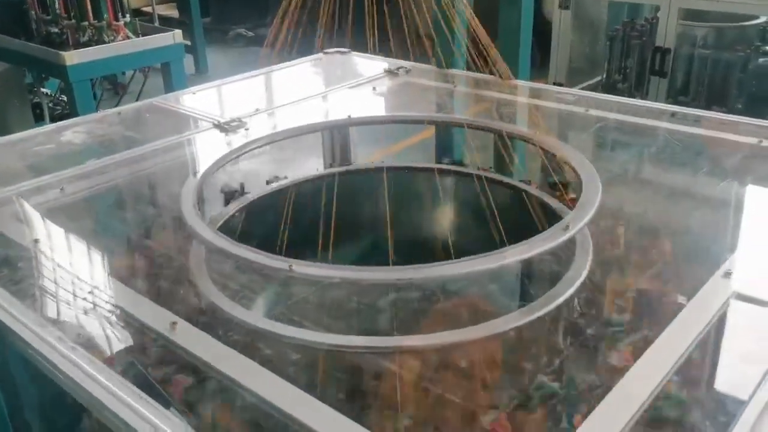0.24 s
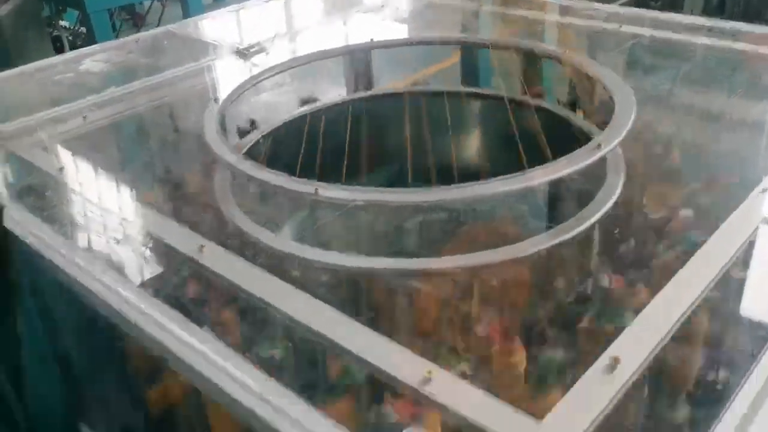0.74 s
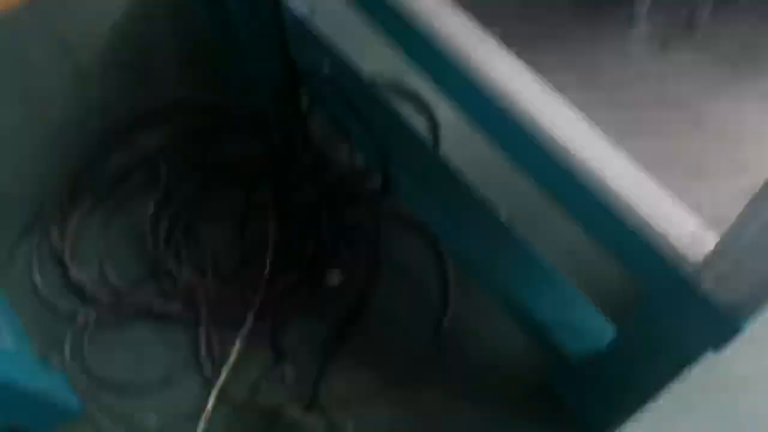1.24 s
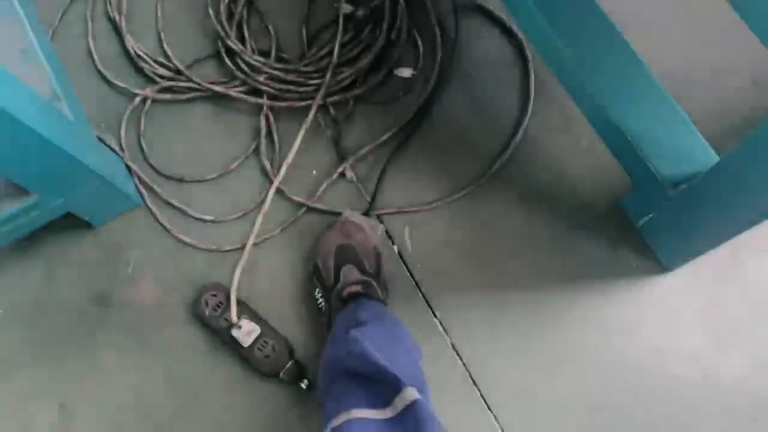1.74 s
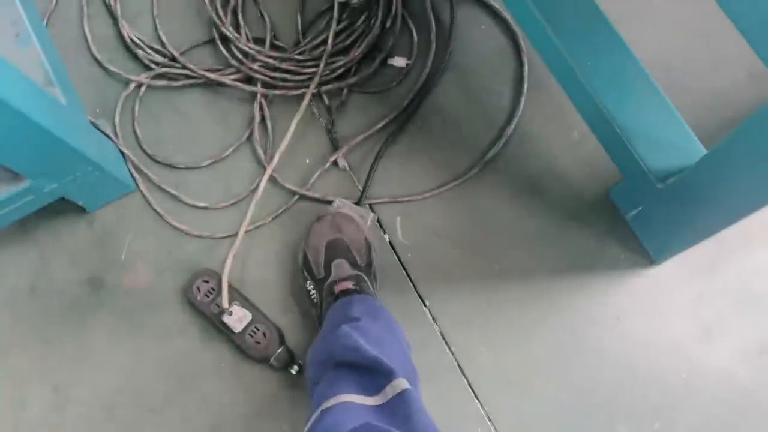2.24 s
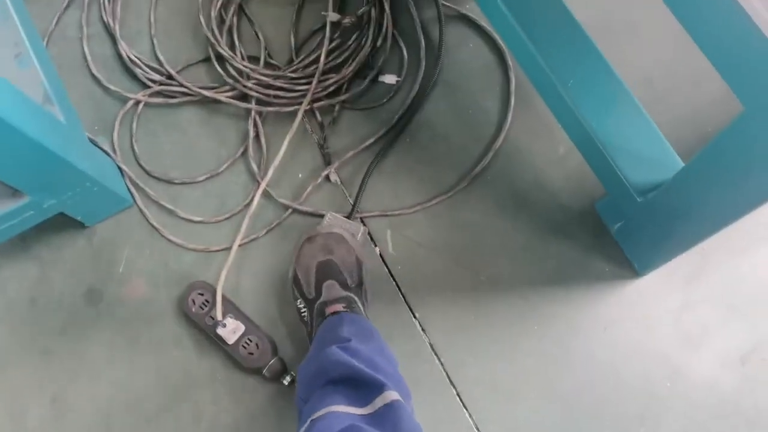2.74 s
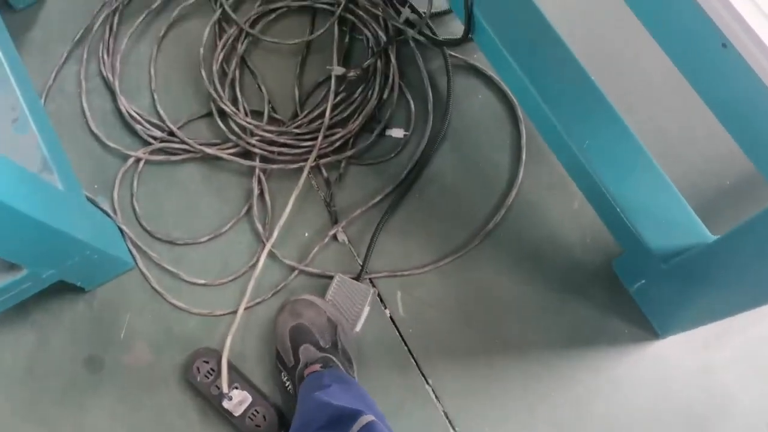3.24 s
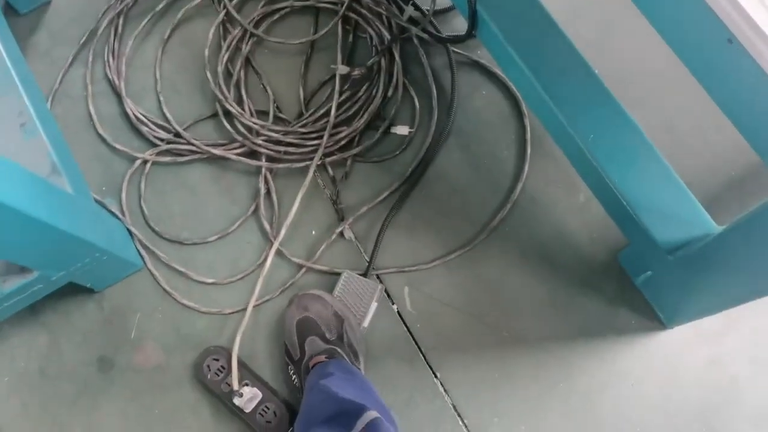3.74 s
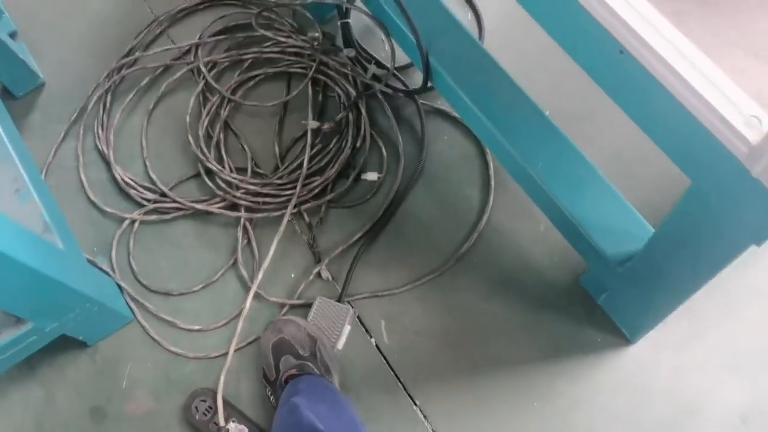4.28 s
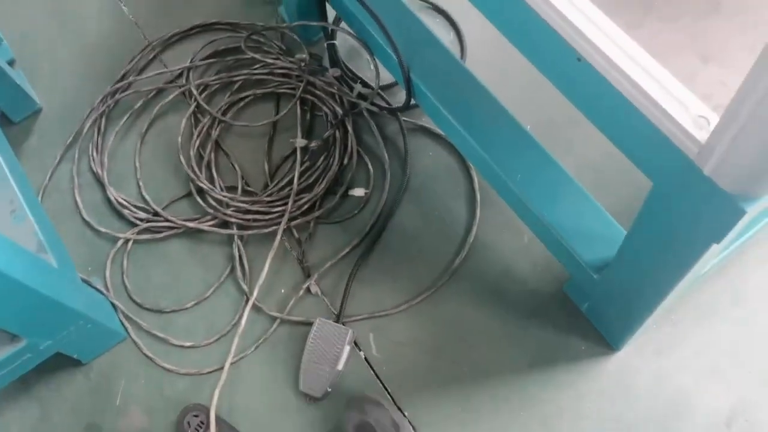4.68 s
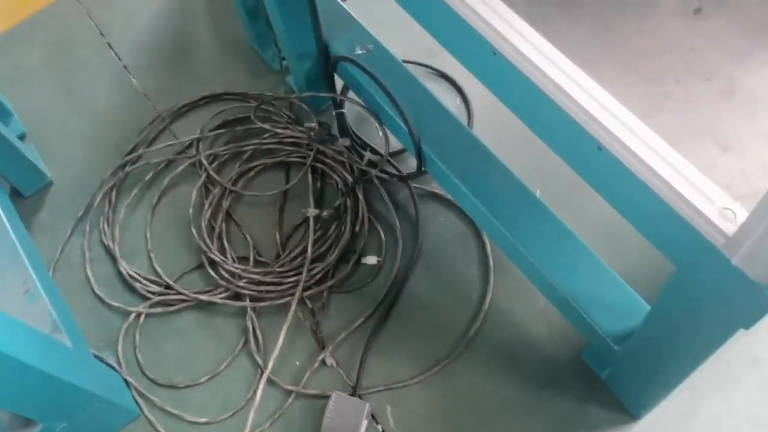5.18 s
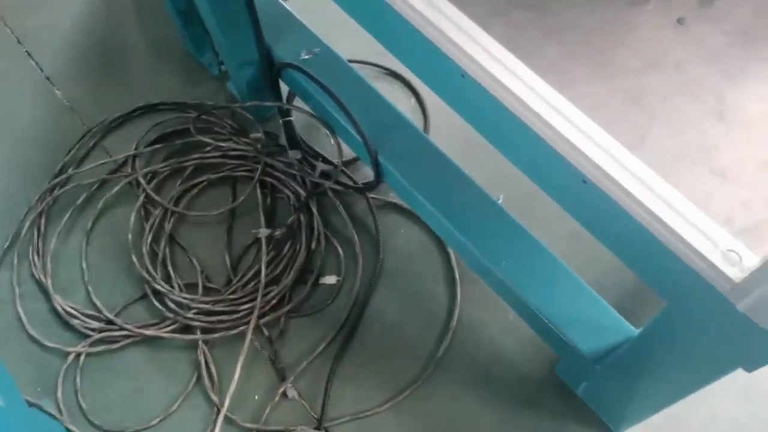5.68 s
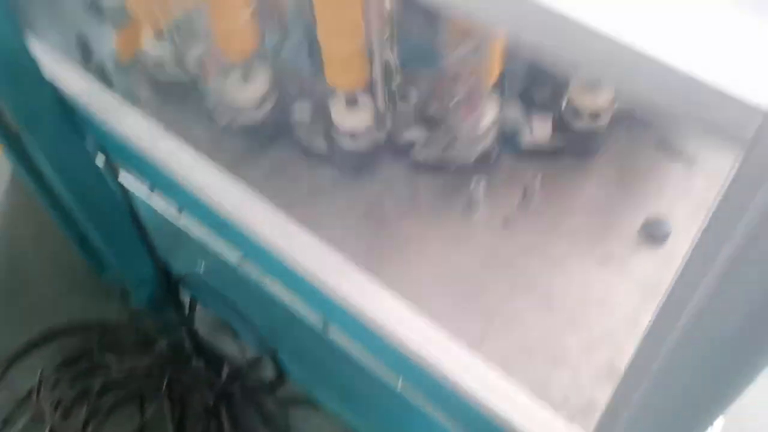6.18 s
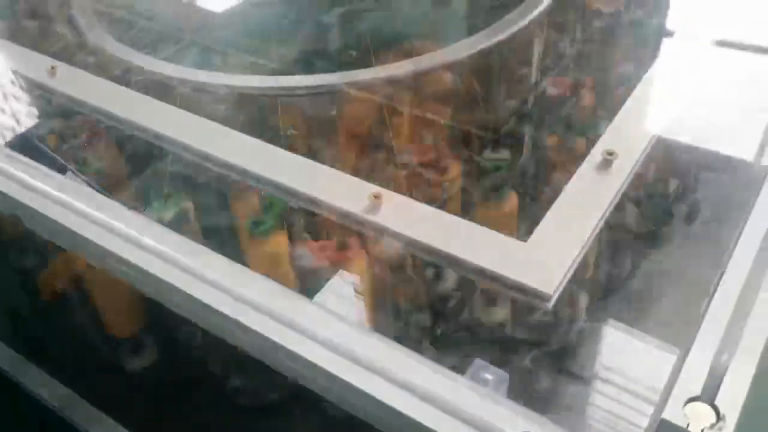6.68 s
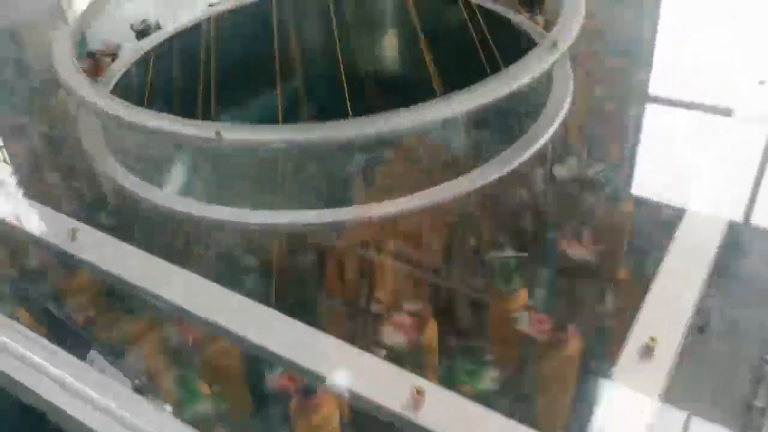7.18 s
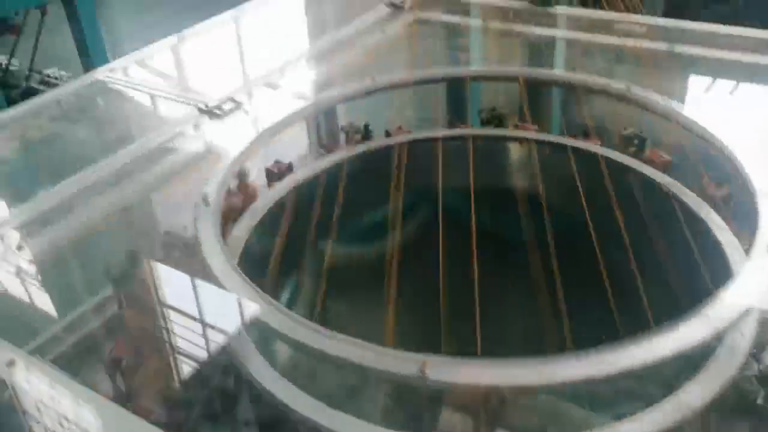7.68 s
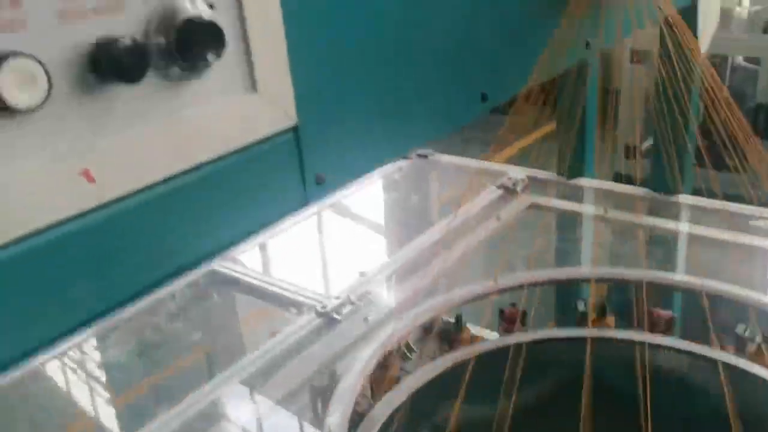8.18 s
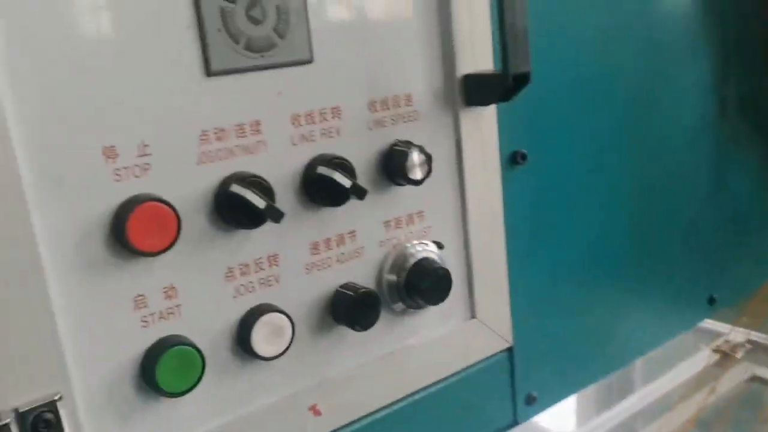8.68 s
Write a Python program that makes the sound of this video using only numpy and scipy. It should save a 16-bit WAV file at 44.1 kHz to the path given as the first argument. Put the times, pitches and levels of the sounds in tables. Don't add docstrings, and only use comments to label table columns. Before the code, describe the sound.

Many metal carriers clack together about nine times a second, ringing the machine frame. The clatter dies within a fraction of a second, leaving distant hums and hiss. A bright switch click, then a short lurching run of under a second; another stop, soft shoe scuffs, a heavier clack of the switch, and a long full-speed run to the end. Handheld microphone in a reverberant factory hall, moving slightly nearer the open top.

```python
import sys
import numpy as np
from scipy import signal
from scipy.io import wavfile
from scipy.ndimage import uniform_filter1d

SR = 44100
rng = np.random.default_rng(int(sys.argv[2]) if len(sys.argv) > 2 else 0)


def transcribe(signal):
    frames = np.atleast_2d(signal).T
    limited = np.clip(frames, -1, 1)
    pcm = np.round(limited * 32767).astype(np.int16)
    wavfile.write(sys.argv[1], SR, pcm)


def elevation(decibels):
    levels = np.asarray(decibels, float)
    return 10 ** (levels / 20)


N = 393372


def evened(x):
    return x / np.sqrt(np.mean(x ** 2) + 1e-20)


def read(points, hz):
    f, value = np.transpose(points)
    return np.interp(np.log(hz + 1), np.log(f + 1), value)


def curve(rows):
    s, *columns = np.transpose(rows)
    return [np.interp(np.arange(N) / SR, s, c) for c in columns]


def add(mix, s, sound):
    part = mix[round(s * SR):][:len(sound)]
    part += sound[:len(part)]


def colour(x, points):
    hz = np.abs(np.fft.fftfreq(8192, 1 / SR))
    (low_hz, low_db), (high_hz, high_db) = points[0], points[-1]
    closed = [(low_hz * .8, low_db - 40)] + list(points) + [(high_hz * 1.15, high_db - 40)]
    log_gain = np.log(elevation(read(closed, hz)))
    taps = np.fft.ifft(np.exp(np.conj(signal.hilbert(log_gain)))).real[:4096]
    return evened(signal.oaconvolve(x, taps)[:len(x)])


def resonate(x, hz, width):
    return signal.lfilter(*signal.iirpeak(hz, hz / width, SR), x)


def resonate_twice(x, hz, width):
    return resonate(resonate(x, hz, width), hz, width)


def bandpass(x, order, low_hz, high_hz):
    return signal.sosfilt(signal.butter(order, [low_hz, high_hz], "bandpass", fs=SR, output="sos"), x)


def wander(per_s):
    steps = rng.standard_normal(round(N / SR * 40) + 2)
    return np.interp(np.arange(N) / SR * per_s, np.arange(len(steps)), steps)


def knocks(per_s, spread_db):
    draw = rng.random(N) * SR / per_s
    size = rng.exponential(1, N)
    return np.where(draw < 1, np.sign(draw - .5) * elevation(spread_db * np.minimum(size, 5)), 0)


# f/Hz, t60/s
ECHO_T60 = [(100, 0.74), (1000, 0.75), (4000, 0.62), (12000, 0.65)]


def room(x):
    out = np.zeros(N)
    slots = np.arange(400, SR - 20, 20)
    for k in range(3):
        taps = np.zeros(SR)
        taps[slots + rng.integers(0, 20, len(slots))] = rng.choice([-1., 1.], len(slots))
        hz, t, z = signal.stft(taps, SR, nperseg=256)
        dying = elevation(-60 * t / read(ECHO_T60, hz)[:, None])
        tail = signal.istft(z * dying, SR, nperseg=256)[1]
        tail = tail[:SR * 2 // 3] / np.linalg.norm(tail)
        turn = np.sqrt(2 / 3) * np.cos(2 * np.pi * (.6 * np.arange(N) / SR + k / 3))
        out += signal.oaconvolve(x * turn, tail)[:N]
    return out


# f/Hz, level/dB
HALL_SPECTRUM = [(25, -14), (45, -10.5), (80, -17.5), (105, -11), (140, -15.5), (190, -8.5), (400, -6.5),
                 (680, -6), (800, -9), (1560, -13), (3000, -20.5), (4600, -32), (6500, -33), (7900, -34.5),
                 (9000, -50), (13000, -50)]
# t/s, level/dB
HALL_DRIFT = [(0, 2), (2.6, .5), (3.4, 0), (4.8, 1), (5.3, -1), (5.45, -2.5), (5.6, .5), (9, 1)]
# f/Hz, width/Hz, level/dB
HUMS = [(186.7, 11, -75), (445, 24, -61), (513, 14, -67), (676.3, 90, -57.5), (930, 10, -73),
        (1170, 55, -63.5), (5510, 260, -62.5)]


def hall():
    frames = N // 256 + 5
    a, b, patches = rng.standard_normal((frames, 513, 3)).T
    patches = evened(uniform_filter1d(uniform_filter1d(patches, 8, 0), 12, 1))
    spectrum_db = read(HALL_SPECTRUM, np.fft.rfftfreq(1024, 1 / SR))[:, None]
    z = (a + 1j * b) * elevation(spectrum_db + 1.4 * patches)
    wash = elevation(-46) * evened(signal.istft(z, nperseg=1024, noverlap=768)[1][:N])
    noise = rng.standard_normal(N)
    hums = sum(elevation(db + 2.6 * wander(7)) * evened(resonate_twice(noise, hz, width))
               for hz, width, db in HUMS)
    return elevation(curve(HALL_DRIFT)[0] + 0.33 * wander(16)) * wash + hums


# t/s, level/dB, brightness/0-1, rattle/ms, spring pitch/share
SWITCH_CLICKS = [(3.114, -51, 1, 3, 1), (3.131, -43, 0.6, 2, 1), (3.141, -49, 1, 3, 1),
                 (3.2335, -38, 1, 2, .8), (3.2352, -28, 0.97, 1.7, 1), (3.2405, -41, 1, 2, .8),
                 (5.352, -22.5, 0.2, 1.3, .85), (5.355, -29.5, 0.05, 5, 1), (5.364, -38, .2, 3, 1),
                 (5.368, -27, 0.5, 2, .87), (5.374, -43, .1, 5, 1), (5.3868, -25, 0.65, 3, 1.05),
                 (5.39, -27, 0.75, 3, .97)]
# f/Hz, width/Hz, level/dB
PLATE = [(780, 200, 5), (1000, 250, 12), (1070, 70, 5), (2560, 300, 7), (2940, 620, 8), (3070, 160, 5),
         (3900, 300, -8), (5600, 600, -5), (6870, 200, -10)]
# f/Hz, width/Hz, level/dB
SPRING = [(2980, 300, -14), (5600, 830, -9), (6120, 360, -5), (7050, 450, 1.5), (7570, 200, -11),
          (9100, 250, -6), (10330, 300, -8), (11500, 450, -8), (12300, 500, -12), (13400, 600, -16)]
# t/s, length/s, level/dB, low edge f/Hz,
# high edge f/Hz
SCUFFS = [(3.04, .2, -51, 600, 740), (3.102, 0.078, -62, 6000, 13000), (3.23, .02, -50, 4300, 5100),
          (3.238, .04, -57, 5000, 13000), (3.238, .045, -56, 6950, 7250), (4.48, .4, -47, 30, 150),
          (4.45, .25, -46, 790, 860), (4.745, 0.08, -55, 6000, 13000), (4.778, 0.14, -54, 2800, 3720),
          (5.319, 0.027, -51, 4500, 13000), (5.333, .05, -44, 600, 3200), (5.366, .026, -49, 2400, 3500),
          (5.385, 0.05, -52, 2000, 12000), (5.483, 0.03, -45, 700, 4200), (5.49, 0.1, -54, 1200, 4000),
          (5.44, .24, -66, 9000, 9600), (5.5, .05, -47, 160, 260), (5.64, .04, -47, 160, 260),
          (5.7, .12, -36, 280, 480)]


def rung(rattle, part, pitch):
    sound = sum(elevation(db) * resonate_twice(rattle, pitch * hz, 1.4 * width) for hz, width, db in part)
    return sound / abs(sound).max()


def foot_switch():
    out = np.zeros(N)
    t = np.arange(1500) / SR
    for s, db, bright, ms, pitch in SWITCH_CLICKS:
        rattle = rng.standard_normal(len(t)) * np.exp(-t * 1000 / ms)
        rattle[0] = 5.6
        bright = np.clip(bright, 0, 1)
        sound = (1 - bright) * rung(rattle, PLATE, 1) + bright * rung(rattle, SPRING, pitch)
        add(out, s, elevation(db + 7) * sound)
    for s, length, db, low_hz, high_hz in SCUFFS:
        hiss = bandpass(rng.standard_normal(SR // 4)[:round(length * SR)], 3, low_hz, high_hz)
        add(out, s, elevation(db) * evened(hiss) * np.hanning(len(hiss)))
    return out + elevation(-22) * room(out)


# starts to turn t/s, spin-up length/s, switched off t/s, frame knocks level/dB
RUNS = [
    (-1, .4, 2.09, -26),
    (3.37, .52, 4.27, -25.5),
    (5.62, .4, 9.5, -25.5),
]
# t/s, whine level/dB
DRIVE = [
    (-1, -55),
    (3.29, -58),
    (5.44, -54),
]
SPIN_UP_BEND = [1.4, 1.3, 1.9]


def motor():
    standing_db, brake_db_per_s, grip_s = -30, 84, .07
    t = np.arange(N) / SR
    run = np.searchsorted([row[0] for row in DRIVE], t, "right") - 1
    on, spin_up, off, full_db = np.array(RUNS)[run].T
    waiting = 1 - (t - on) / spin_up
    rising_db = standing_db * np.clip(waiting, 0, 1) ** np.array(SPIN_UP_BEND)[run]
    rising_db -= 300 * np.maximum(waiting - 1, 0)
    late = np.maximum(t - off, 0)
    braking_db = -brake_db_per_s * (late - grip_s * (1 - np.exp(-late / grip_s)))
    return rising_db, braking_db, full_db, run


def drive_whine():
    t = np.arange(N) / SR
    rising_db, braking_db, _, run = motor()
    on, full_db = np.array(DRIVE)[run].T
    beating_db = 2.5 * np.sin(2 * np.pi * 11 * t) * np.sin(2 * np.pi * 4.3 * t)
    swelling_db = -18 * np.exp(-(t - on) / .12)
    fading_db = 130 * np.maximum(t - np.array(RUNS)[run, 2], 0)
    level_db = full_db + beating_db + swelling_db - fading_db
    smear = np.clip(.12 + elevation(.6 * (rising_db + braking_db)), 0, 1)
    jitter = evened(uniform_filter1d(rng.standard_normal(N), 120))
    hz = 10002 + smear * (-60 + 130 * jitter)
    tone = np.sqrt(2) * np.sin(2 * np.pi * np.cumsum(hz) / SR)
    return elevation(level_db) * np.minimum((t - on) / .02, 1) * tone


CROSSING_S = [1, 4.031, 7.324]


def cycle(lack_db, run):
    crossings_per_s, lag_db = 8.75, 4
    speed = np.minimum(elevation(.5 * (lack_db + lag_db)), 1)
    turns = np.cumsum(speed) * crossings_per_s / SR
    return turns - turns[(np.array(CROSSING_S) * SR).astype(int)][run], speed


# place/share of cycle, level/dB
SWARM = [(0, 2.5), (.25, 4.03), (.42, 0.3), (.55, 2.9), (.8, 0), (.93, 0.5), (1, 2)]


def crossing_swarm(lack_db, run):
    turns, speed = cycle(lack_db, run)
    half_cycle = np.floor(2 * turns).astype(int) + 200
    strength_db = .6 * rng.standard_normal(400)[half_cycle]
    shape_db = .85 * np.interp(turns % 1, *np.transpose(SWARM))
    swarm = elevation(speed * (shape_db + uniform_filter1d(strength_db, 300)))
    speed = np.maximum(speed, .45)
    return swarm / np.sqrt(speed), speed


# f/Hz, t60/s, then level/dB in runs 1, 2, 3
RINGS = [(200.6, 0.12, 0, 2, -4), (399, 0.066, 2.5, -6, -1.5), (428, 0.078, 0.5, 1.5, 0),
         (700, 0.088, -1, 0, 2), (780, 0.054, -1, 1, -2), (860, 0.074, 2.5, -7.5, -6.5),
         (1088, 0.083, -5, -1.5, -3), (1837, .08, -2.5, -4, -4), (1970, 0.088, 0, -11, -4),
         (2198, 0.1, -3, 1, -4)]


def ringing_parts(swarm, speed, run):
    t = np.arange(6000) / SR
    out = np.zeros(N)
    for hz, t60, *db in RINGS:
        blows = swarm * elevation(np.array(db)[run]) * knocks(55 * speed, 2.4)
        ring = elevation(-60 * t / t60) * np.sin(2 * np.pi * hz * t)
        out += signal.oaconvolve(blows, ring)[:N]
    return evened(out)


# t/s, level/dB, f/Hz
STRUCK = [(0.006, -27.6, 775.0), (0.073, -27.7, 452.0), (0.192, -24.6, 409.0), (0.221, -28.0, 872.0),
          (0.337, -28.1, 915.0), (0.424, -28.1, 420.0), (0.491, -27.6, 851.0), (0.537, -27.1, 398.0),
          (0.558, -27.5, 851.0), (0.654, -24.1, 431.0), (0.787, -25.6, 786.0), (0.886, -27.2, 732.0),
          (1.109, -25.8, 743.0), (1.159, -27.7, 205.0), (1.33, -30.6, 2196.0), (1.335, -27, 444),
          (1.469, -23.6, 420.0), (1.687, -25.9, 334.0), (1.788, -27.0, 711.0), (1.82, -24.1, 420.0),
          (2.058, -27.1, 409.0), (2.079, -30.9, 1163.0), (3.652, -30.2, 194.0), (3.777, -29.6, 2196.0),
          (3.797, -26.7, 301.0), (3.811, -26.5, 818.0), (3.913, -27.0, 377.0), (3.916, -33.6, 2885.0),
          (4.044, -26.9, 721.0), (4.139, -25.1, 431.0), (4.221, -25.6, 194.0), (4.29, -31.6, 2035.0),
          (5.872, -25.7, 194.0), (5.942, -26.5, 398.0), (5.977, -25.7, 194.0), (6.055, -25.9, 797.0),
          (6.058, -26.9, 205.0), (6.14, -30, 1750), (6.194, -29.9, 2078.0), (6.203, -26.2, 668.0),
          (6.255, -28.4, 194.0), (6.482, -24.4, 431.0), (6.572, -29.1, 1841.0), (6.63, -25.9, 786.0),
          (6.755, -27.1, 818.0), (6.836, -26.7, 700.0), (6.856, -28.5, 183.0), (6.914, -26.8, 571.0),
          (6.987, -26.6, 635.0), (7.384, -24.4, 711.0), (7.544, -25.9, 398.0), (7.683, -24.4, 689.0),
          (7.739, -26.1, 689.0), (7.776, -24.1, 431.0), (7.823, -25.5, 420.0), (7.904, -30.3, 2164.0),
          (7.953, -30.2, 1852.0), (8.011, -27.7, 872.0), (8.087, -27.2, 172.0), (8.818, -25.8, 775.0)]


def struck():
    out = np.zeros(N)
    t = np.arange(6000) / SR
    shape = np.minimum(t / .014, 1) * elevation(-60 * t / .24)
    for s, db, hz in STRUCK:
        tones = np.sin(2 * np.pi * hz * t) + .3 * np.sin(2 * np.pi * 1.045 * hz * t)
        add(out, s, elevation(db + 5.5) * shape * tones)
    return out


# t/s, peak level/dB, f/Hz
TICKS = [(0.0348, -18, 2080), (0.0797, -18, 2200), (0.3142, -17, 2080), (0.3571, -19, 1980),
         (0.4234, -18, 1940), (0.4788, -19, 1680), (0.5402, -18, 1900), (0.6524, -18, 1330),
         (0.7831, -18, 1850), (0.8859, -18, 2260), (1.0196, -17, 1910), (1.1303, -17, 1730),
         (1.2251, -17, 2140), (1.3448, -16, 1850), (1.5713, -18, 2200), (1.7534, -17, 1330),
         (1.7948, -16, 2640), (1.8402, -16, 1890), (1.9155, -19, 2120), (2.0203, -17, 1740),
         (2.1106, -17, 2410), (2.149, -19, 2640), (3.909, -18, 2180), (4.0472, -17, 2090),
         (4.0921, -15, 2200), (4.1565, -16, 2790), (5.3517, -23, 2850), (5.9514, -18, 1670),
         (6.0053, -18, 1460), (6.129, -19, 1680), (6.1564, -14, 2150), (6.1828, -16, 1630),
         (6.3016, -16, 1830), (6.4073, -17, 1340), (6.4712, -16, 2240), (6.5091, -16, 1900),
         (6.5465, -16, 1840), (6.7555, -17, 2130), (6.8648, -15, 1910), (7.0449, -16, 2060),
         (7.0883, -17, 1830), (7.2085, -19, 2090), (7.2968, -19, 2010), (7.3248, -15, 2200),
         (7.3831, -17, 2060), (7.4415, -19, 2190), (7.4874, -18, 1830), (7.5642, -17, 1760),
         (7.672, -18, 2270), (7.8875, -18, 1860), (7.9144, -16, 2150), (7.9683, -16, 1870),
         (8.1264, -16, 1950), (8.2462, -15, 2140), (8.3564, -18, 2460), (8.5869, -17, 2160),
         (8.6986, -17, 1710), (8.8139, -16, 2430)]
# t/s, peak level/dB, f/Hz
THUDS = [(0.035, -14, 921), (0.081, -14, 447), (0.107, -17, 813), (0.145, -14, 864), (0.2, -15, 406),
         (0.309, -17, 431), (0.652, -16, 431), (0.789, -14, 783), (0.881, -16, 716), (1.114, -16, 743),
         (1.225, -15, 571), (1.335, -14, 444), (1.451, -17, 764), (1.479, -13, 428), (1.566, -16, 366),
         (1.679, -16, 452), (1.717, -15, 439), (1.799, -14, 703), (1.906, -15, 423), (1.971, -17, 425),
         (2.04, -15, 721), (2.071, -15, 441), (2.116, -18, 444), (3.653, -20, 587), (3.802, -15, 746),
         (3.922, -15, 353), (4.03, -13, 738), (4.146, -14, 420), (4.263, -15, 579), (5.351, -24, 1060),
         (5.868, -18, 409), (5.95, -14, 447), (6.059, -13, 799), (6.201, -15, 600), (6.299, -12, 837),
         (6.642, -12, 770), (6.832, -16, 700), (6.888, -15, 694), (6.927, -15, 560), (7.098, -17, 649),
         (7.21, -13, 452), (7.327, -15, 450), (7.39, -14, 708), (7.555, -14, 412), (7.667, -14, 406),
         (7.755, -13, 764), (7.784, -13, 425), (7.904, -16, 366), (8.009, -16, 872), (8.128, -15, 665),
         (8.187, -16, 563), (8.241, -14, 439), (8.358, -17, 530), (8.4, -16, 711), (8.832, -12, 781)]
# f/share of pitch, level/dB
TICK_PARTS = [(.78, -7), (.91, -5), (1, 0), (1.12, -5), (1.31, -7), (1.56, -9)]


def ticks():
    out = np.zeros(N)
    t = np.arange(3000) / SR
    shape = np.minimum(t / .003, 1) * elevation(-60 * t / .045)
    for rows, layer_db in ((TICKS, -6), (THUDS, -9)):
        for s, db, hz in rows:
            cluster = sum(elevation(g) * np.sin(2 * np.pi * share * hz * t) for share, g in TICK_PARTS)
            add(out, s, elevation(db + layer_db) * shape * cluster)
    return out


# t/s, level/dB
HARD = [(0.0807, -26), (0.215, -19), (0.4224, -21), (0.4783, -21), (0.5402, -31), (0.6534, -25),
        (0.775, -20), (0.8874, -15), (1.3, -24), (1.3409, -24), (1.5723, -23), (1.681, -22), (1.7943, -31),
        (2.0223, -29), (2.151, -33), (3.44, -42), (3.49, -39), (3.57, -32), (3.6646, -25), (3.9235, -24),
        (4.151, -25), (4.4, -27), (6.1819, -33), (6.2996, -25), (6.4129, -28), (6.755, -22), (7.2116, -20),
        (7.3238, -29), (7.4391, -22), (7.5677, -19), (7.7, -23), (8.1265, -23), (8.4711, -21), (8.586, -23),
        (8.6977, -18.5), (8.8149, -27)]


def hard_knocks():
    t = np.arange(6000) / SR
    blows = np.zeros(N)
    for s, db in HARD:
        add(blows, s, elevation(db - 7 - 60 * t / 0.16) * np.minimum(t / .006, 1) * rng.standard_normal(len(t)))
    return bandpass(blows, 2, 1900, 9000)


# t/s, level/dB, weight/0-1
LURCHES = [(2.24, -35, .8), (3.51, -41, .6), (3.57, -40, 0), (3.595, -40, 0), (3.648, -31, .7),
           (3.665, -35, 0), (3.795, -29, .4), (4.2, -28, 1), (4.41, -36, .5), (5.705, -40, .2),
           (5.77, -38, .2), (5.785, -31, .3), (5.86, -34, 1), (5.945, -32, .3)]


def lurches(light, heavy):
    t = np.arange(6000) / SR
    light_level, heavy_level = np.zeros((2, N))
    for s, db, weight in LURCHES:
        burst = elevation(db - 60 * t / .2) * np.minimum(t / .025, 1)
        weight = np.clip(weight, 0, 1)
        add(light_level, s, (1 - weight) * burst)
        add(heavy_level, s, weight * burst)
    return elevation(2.5) * (light_level * light + heavy_level * heavy)


# f/Hz, then level/dB in runs 1, 2, 3
FRAME = [(228, -12.5, -15, -13.5), (300, -5, -3, -5.5), (320, -6.5, -1, -7.5), (370, -3, -2, -2),
         (440, 1, -4, -1), (475, -4, -3, -5.5), (606, -4.5, -3, -.5), (700, -4, -4.5, -2.5),
         (830, -1.5, -1, -2.5), (1010, -7.5, -6, -6.5), (1073, -5, -7.5, -7.5), (1180, -8.5, -4.5, -9),
         (1256, -8, -8, -8), (1513, -14.5, -13, -14)]
# f/Hz, level/dB
CLACK = [(760, -29.5), (1300, -10.5), (1600, -3.5), (1900, -1.5), (2690, -5.7), (2950, -4), (3200, -7.3),
         (4870, -11.5), (5310, -13.5), (7230, -14), (7760, -16), (8600, -42), (11200, -50), (18900, -120)]
# f/Hz, level/dB
RUMBLE = [(30, -15), (50, -15), (60, -11.5), (70, -19.5), (85, -8.5), (115, -1), (135, -7.5), (160, -1),
          (200, -1.5), (235, -10.5), (270, -10)]
# f/Hz, level/dB
FIZZ = [(4940, -47), (8400, -11.5), (8640, -7), (9600, 1), (10100, -1.5), (11100, -7), (11800, -5),
        (11960, -1.5), (12150, -5.5), (13600, -8), (14100, -10)]
# level over the frame/dB, then shares followed of spin-up, braking and nearness
CLACK_LAW = (-3.3, 1.2, 1.17, 1.5)
RUMBLE_LAW = (-8, .9, .9, 2.2)
FIZZ_LAW = (-19.8, .7, .92, 1.3)
# t/s, level/dB
NEARNESS = [(0, 0), (1, 0), (1.6, .6), (4, .2), (6, .5), (7, .3), (7.6, 1), (8.3, .8), (8.92, .6)]
# t/s, level over the clack/dB
BOBBINS = [(0, -22), (2, -22), (3.6, -19), (4.4, -19), (5.95, -24), (6.15, -13), (7.2, -15), (7.6, -30),
           (8.92, -34)]


def machine():
    rising_db, braking_db, full_db, run = motor()
    lack_db = rising_db + braking_db
    near_db = curve(NEARNESS)[0]

    def layer_db(law):
        db, up, down, near = law
        return full_db + db + up * rising_db + down * braking_db + near * near_db

    clack_db = layer_db(CLACK_LAW)
    swarm, speed = crossing_swarm(lack_db, run)
    shared = 0.61 * evened(knocks(3000 * speed, 2.6))
    heavy = swarm * (shared + 1.14 * evened(knocks(2600 * speed, 2.13)))
    sharp = swarm ** 1.15 * (shared + 1.16 * evened(knocks(5000 * speed, 1.67)))
    frame = np.choose(run, [colour(heavy, [(row[0], row[k]) for row in FRAME]) for k in (1, 2, 3)])
    clack = colour(sharp, CLACK)
    rumble = colour((swarm ** 2 * speed) ** 0.34 * rng.standard_normal(N), RUMBLE)
    bobbins = evened(resonate_twice(sharp, 2080, 750))

    body = elevation(-.4) * frame + elevation(-10) * ringing_parts(swarm, speed, run)
    dry = elevation(full_db + lack_db) * body + elevation(clack_db) * clack
    dry += elevation(layer_db(RUMBLE_LAW)) * rumble
    dry += elevation(layer_db(FIZZ_LAW) + .9 * wander(20)) * colour(sharp, FIZZ)
    dry += elevation(clack_db + curve(BOBBINS)[0]) * bobbins
    dry += struck() + elevation(lack_db) * ticks() + hard_knocks()
    dry += lurches(frame + clack, rumble)
    return elevation(-1.0) * dry + elevation(-10.5) * room(dry)


def scene():
    return (hall() + foot_switch() + drive_whine() + machine())[None]


# f/Hz, level/dB per Hz
MASK = [(2500, -110), (4000, -91), (5200, -92), (6500, -82.5), (7800, -85), (8150, -77), (9050, -76),
        (9400, -82), (11000, -79), (12000, -80), (13500, -82), (13650, -74), (14300, -76)]
# t/s, level/dB
TOP_LOSS = [(0, 3), (2.2, 3), (3.3, -4), (4.4, -1), (5.4, -4), (5.9, -2), (7.55, -2), (7.7, 6), (8.92, 5)]


def drop_masked(x):
    window = signal.windows.kaiser_bessel_derived(2048, 4 * np.pi)
    hz, t, z = signal.stft(np.roll(x, -354), SR, window, 2048, 1024, scaling="psd")
    power = 2 * abs(z) ** 2 + 1e-24
    band = np.arange(len(hz)) // 16
    band_db = 10 * np.log10(np.add.reduceat(power, np.arange(0, len(hz), 16)) / 16)[band]
    loud_db = 10 * np.log10(power.sum(0) * hz[1])

    waver_db = 3.5 * evened(uniform_filter1d(rng.standard_normal((len(t), 65)), size=2, axis=0)).T[band]
    chance = evened(uniform_filter1d(rng.standard_normal(len(t)), size=2))
    loss_db = np.interp(t, *np.transpose(TOP_LOSS))
    top_db = (hz > 12150)[:, None] * (loss_db + 1.1 * np.maximum(loss_db, 0) * chance)
    waver_db += 1.3 * chance + top_db
    mask_db = read(MASK, hz)[:, None] + 0.66 * (loud_db + 18) + waver_db
    line_db = .25 * band_db + 0.75 * 10 * np.log10(power)
    kept = 1 / (1 + np.exp(np.clip(4 * (mask_db - line_db), -30, 30)))

    a, b = rng.standard_normal((len(t), len(hz), 2)).T
    patches = (rng.random((len(t), 129)).T < .42)[np.arange(len(hz)) // 8] * (hz < 13600)[:, None]
    whining = sum((t > on) & (t < on + .4) for on, _ in DRIVE) * (hz > 10200)[:, None]
    haze = elevation(-126) * (a + 1j * b) * patches * (1 - whining) * (loud_db < -36)
    return np.roll(signal.istft(z * kept + haze, SR, window, 2048, 1024, scaling="psd")[1][:N], 354)


def roll_off(x):
    return signal.sosfilt(signal.butter(12, 14330, fs=SR, output="sos"), x)


def record(dry):
    x = signal.sosfilt(signal.butter(2, 45, "highpass", fs=SR, output="sos"), dry[0])
    x = drop_masked(x)
    x = signal.oaconvolve(x, signal.firwin(511, 14200, window=("kaiser", 9), fs=SR), "same")
    return roll_off(x[None])


dry = scene()
out = record(dry)
transcribe(out)
```